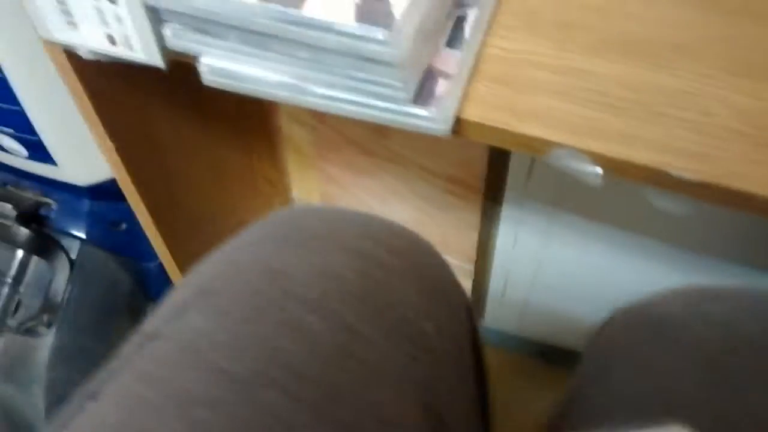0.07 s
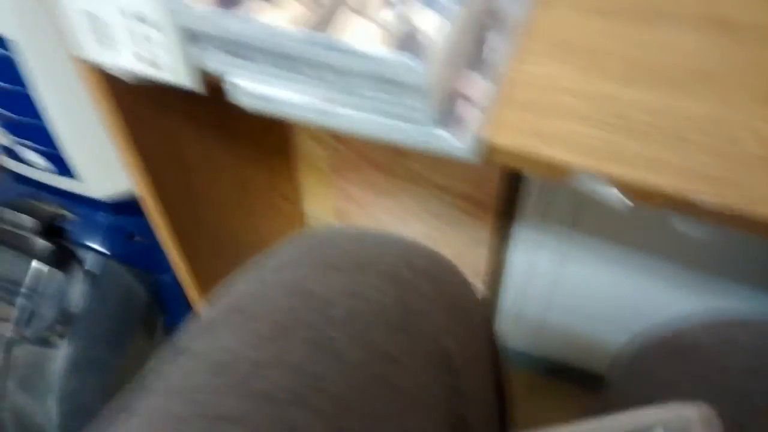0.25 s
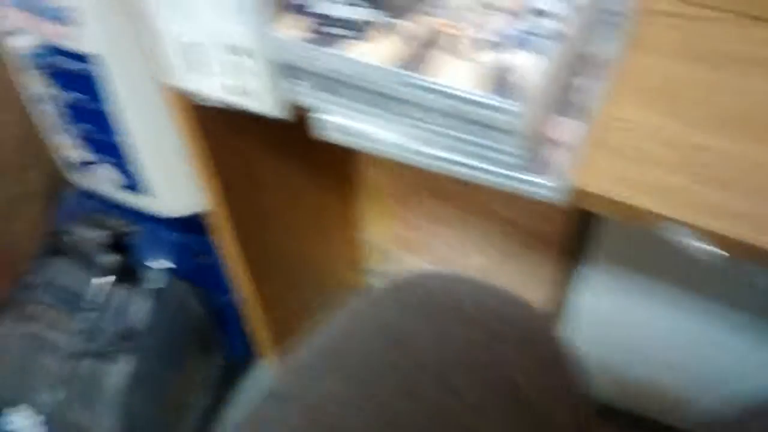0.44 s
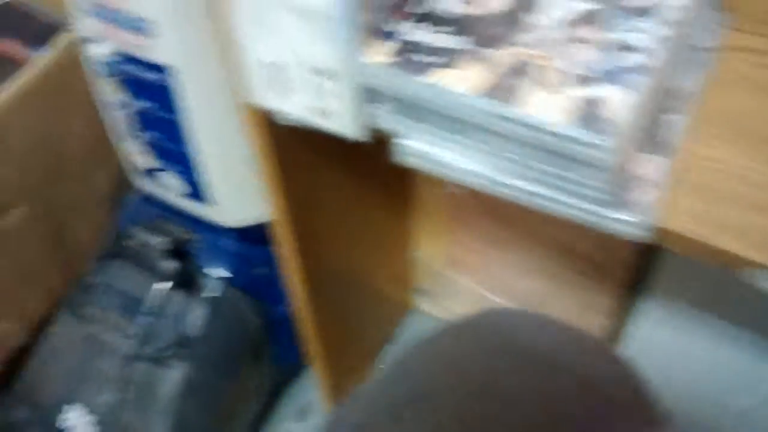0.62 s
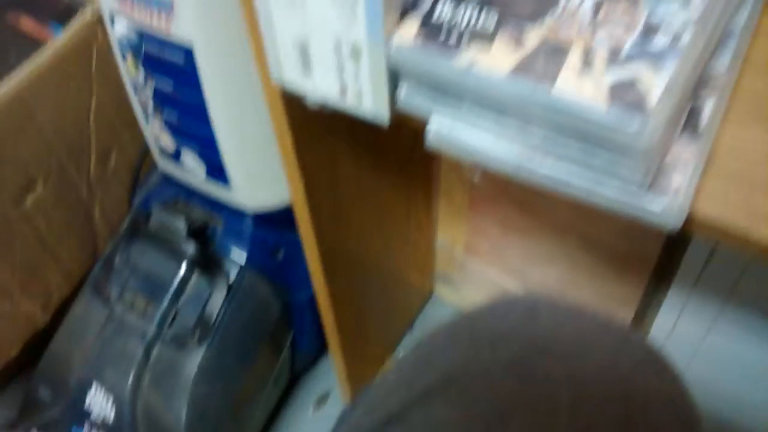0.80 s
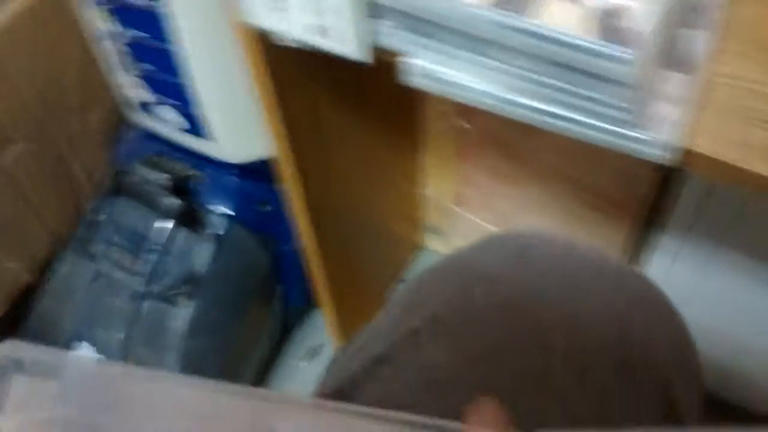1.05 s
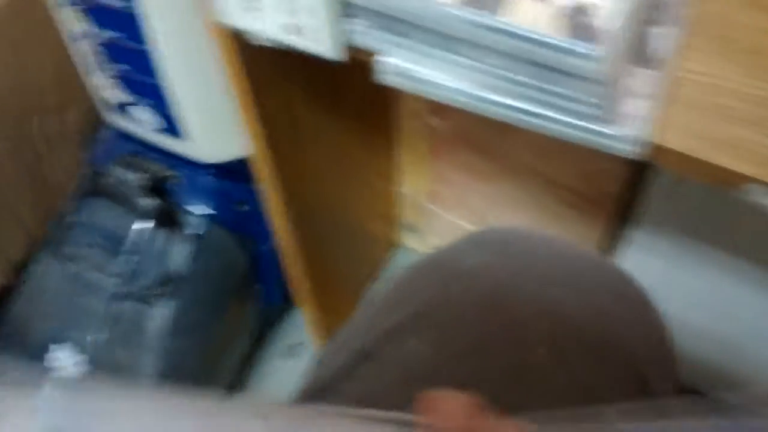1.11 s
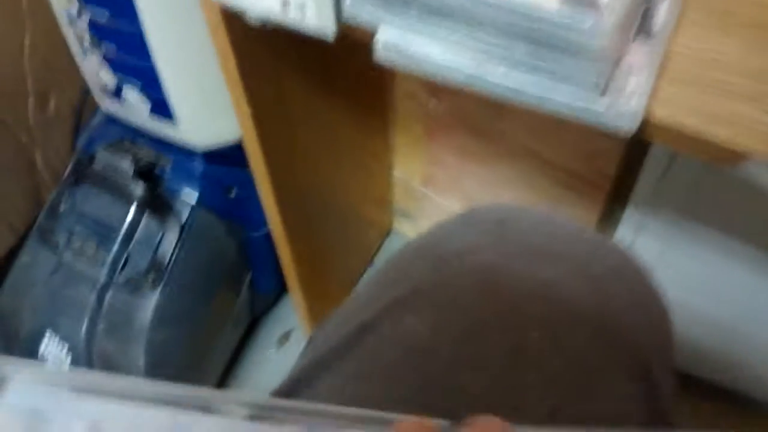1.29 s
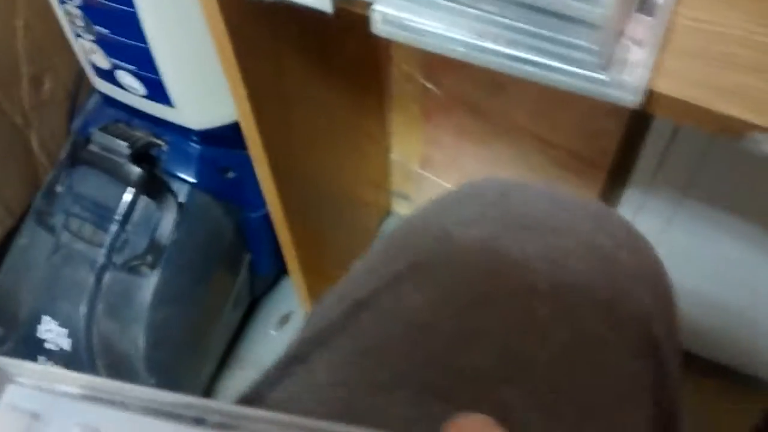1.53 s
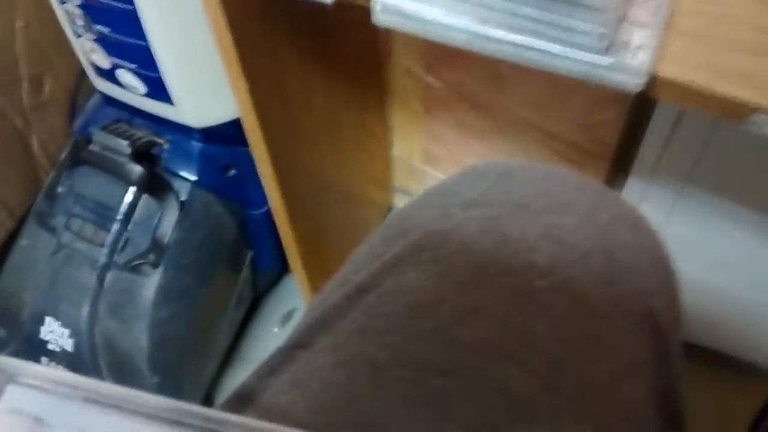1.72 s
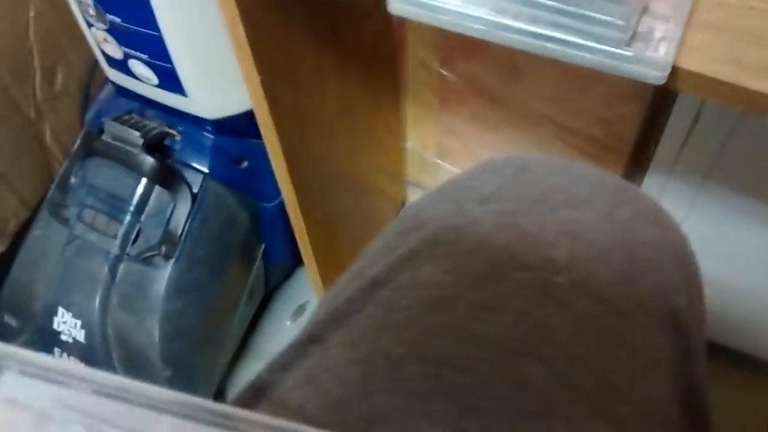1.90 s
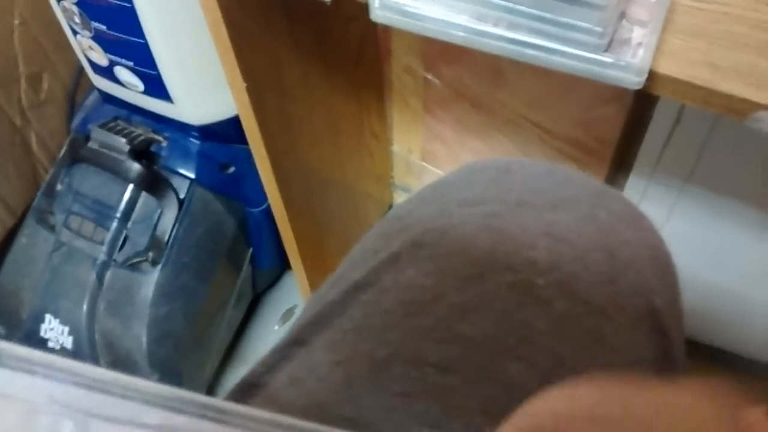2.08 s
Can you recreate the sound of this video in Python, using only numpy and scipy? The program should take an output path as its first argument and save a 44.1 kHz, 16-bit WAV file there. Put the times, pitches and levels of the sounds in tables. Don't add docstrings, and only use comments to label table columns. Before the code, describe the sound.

A thin hard plastic disc case is handled close to the microphone. Faint ticks lead to a loud, tight burst of snaps at 0.2-0.26 seconds. Quieter clicks at 0.5 become a rattling, creaking run from 0.6 to 0.8, ending in a sharper clack. Small snaps return around 1.26-1.34, then sparse ticks and soft finger slides near 1.9-2.0. Dull grip thuds, faint hiss and hum, small quiet room.

```python
import sys
import numpy as np
from scipy import signal
from scipy.io import wavfile
from scipy.ndimage import uniform_filter1d

SR = 44100
rng = np.random.default_rng(int(sys.argv[2]) if len(sys.argv) > 2 else 0)


def convert_level_to_amplitude(level_db):
    exponent = np.asarray(level_db, float) / 20
    return 10 ** exponent


def bounce(signal):
    frames = np.transpose(np.atleast_2d(signal))
    limited = np.clip(frames, -1, 1)
    pcm = np.round(limited * 32767).astype(np.int16)
    wavfile.write(sys.argv[1], SR, pcm)


N = 94815

SNAP_STARTS = [.2085, .2153, .221, .2295, .2405, .2443, .247, .255, .4865, .4915, .5115, .5965, .609, .624,
               .637, .683, .697, .7005, .7115, .716, .728, .7325, .741, .753, .7595, .8005, .803, .8052,
               .808, 1.2608, 1.274, 1.2967, 1.2985, 1.3358, 1.337]
# peak_db, brightness_db_per_octave, rattle_s, panel_pitch_hz, edge_pitch_hz
SNAP_BLOWS = [(0, 0, 0.0014, 534, 1900), (0.5, -0.5, 0.0018, 600, 1790), (-7, -1.5, .005, 347, 3400),
              (-5, 0, 0.0034, 2300, 3850), (-7, 0, 0.0023, 1380, 2000), (0, 3.5, 0.0029, 730, 4050),
              (-3.5, -3.5, 0.0071, 630, 1650), (-9.5, 2.5, 0.0046, 830, 3000), (-29.5, 0, .004, 3160, 3000),
              (-26.5, 0.5, 0.0035, 665, 1760), (-25, -2, 0.0053, 1650, 3900),
              (-18.5, -3, 0.0033, 1627, 2320), (-27.5, 0, .004, 900, 2830), (-29, 9, 0.0024, 3500, 5800),
              (-21.5, 3, 0.00057, 1200, 6000), (-20.5, 0, 0.0073, 600, 2370), (-15, 0, 0.0054, 900, 2620),
              (-21.5, 0, 0.002, 700, 1500), (-15, 1, 0.0035, 966, 2650), (-22, 0.5, 0.0021, 1670, 2700),
              (-17.5, 1, 0.0046, 725, 2800), (-22, 0, 0.0011, 1200, 3000), (-21, -1.5, 0.0049, 1700, 2750),
              (-30.5, 4, .002, 1750, 3700), (-23.5, 1, .003, 910, 1900), (-21, 5, 0.0025, 1590, 2650),
              (-18, 0.5, 0.0023, 700, 2200), (-10.5, 0.5, 0.0032, 433, 1555), (-18, 0, 0.004, 630, 2700),
              (-17.5, 1, 0.0043, 380, 2670), (-28, 0, 0.0041, 650, 2500), (-20.5, 7, 0.0018, 1200, 2757),
              (-19.5, -3, 0.0036, 614, 1450), (-20.5, 6, 0.0017, 2360, 3390),
              (-16.5, -0.5, 0.0032, 623, 1450)]
# start_s, peak_db, brightness_db_per_octave, spot_pitch_hz
SMALL_TICKS = [(.007, -35, -3.5, 610), (.025, -35, -10, 610), (0.122, -42, -1, 403), (.277, -19, 1, 645),
               (.330, -27.5, -3, 1640), (.361, -31.5, -1, 3270), (.390, -39, 4, 4060),
               (0.572, -36.5, -3.5, 3900), (0.8599, -30, -3.5, 1680), (.945, -33, 0.5, 2000),
               (.983, -32, -0.5, 1460), (1.033, -40.5, 2, 3460), (1.158, -35, -4.5, 3440),
               (1.198, -34, 2, 2620), (1.210, -40.5, -4.5, 1360), (1.413, -38, 3, 4430),
               (1.451, -27.5, -1, 1530), (1.534, -33.5, -1.5, 655), (1.583, -33.5, -1.5, 1430),
               (1.598, -38, 4, 1300), (1.828, -39, -0.5, 480), (1.852, -34.5, -5, 1300),
               (1.949, -32.5, -1, 600), (1.966, -31.5, -1, 1300), (1.997, -30.5, 6, 6800),
               (2.055, -37.5, -1, 1350)]
# pitch_hz, level_db, t60_s
SHELL_MODES = [(291, -9, 0.044), (424.3, -4.5, 0.041), (636.4, 1.5, 0.044), (870, -13, 0.013),
               (1300, -3, 0.04), (1626, -3.5, 0.028), (2000, -22, 0.0049), (2294, -6.5, 0.079),
               (2620, 4.5, 0.022), (3257, 0, 0.025), (3750, -11.5, 0.026), (4110, -5, 0.018),
               (5700, -13, 0.03), (6483, -2, 0.015)]
# frequency_hz, level_db_per_hz
CRACK_COLOUR = [(200, -6), (500, -4.5), (1000, 0.5), (2300, -2.5), (4200, -4.5), (5200, -16.5),
                (9000, -21.5), (15000, -42)]
# time_s, level_db
RUB_PRESSURE = [
    (0.0, -60.5),
    (0.56, -62.5),
    (0.68, -50),
    (1.71, -68),
    (2.15, -71),
]
# start_s, crest_s, end_s, dull_level_db, bright_level_db
SLEEVE_SLIDES = [
    (0.577, 0.592, 0.6, -46, -50),
    (0.641, 0.643, 0.74, -52, -44),
    (0.673, .72, 0.65, -47, -44),
    (0.797, 0.802, .806, -38, -47),
    (1.404, 1.406, 1.468, -56, -45),
    (1.84, 1.871, 1.897, -45.5, -51),
    (1.888, 1.955, 1.928, -41, -47.5),
    (1.94, 1.98, 2.02, -40, -41),
    (2.031, 2.053, 2.04, -59, -53.5),
]
# pitch_hz, width_hz, level_db
SLEEVE_MODES = [(600, 72, -9.5), (1300, 24, -8), (1474, 250, 0), (2200, 36, -6.5), (3100, 100, 2.5),
                (3870, 93, -2), (6800, 130, -12), (9410, 48, -24.5)]
# start_s, level_db, pitch_hz
HAND_JOLTS = [(0.223, -25, 113), (.247, -20, 37.5), (0.49, -39, 82.5), (0.584, -25.5, 87), (0.693, -24, 80),
              (0.744, -23, 102.5), (0.799, -27.5, 99), (0.816, -31, 40), (1.031, -46, 100),
              (1.261, -33.5, 110), (1.339, -32, 80), (1.95, -39, 49)]
# frequency_hz, level_db_per_hz
ROOM_COLOUR = [(12, -53), (20, 2), (68, -12.5), (86, -25), (120, -17.5), (200, -20), (500, -22.5),
               (3530, -27.5), (16000, -37)]
# frequency_hz, t60_s
WALL_DECAY = [(250, 0.17), (1000, 0.14), (4000, 0.17), (12000, 0.14)]
# frequency_hz, left_right_likeness (-1..1), left_minus_right_db
PORT_PAIR = [(40, -.4, 2), (300, .95, 3), (1100, .95, 4), (1550, .8, -5), (1950, -.95, -5), (2450, -.9, -5),
             (2800, -.3, -5), (3400, .75, -4), (4200, .55, -5), (5000, -.3, 1), (9000, -.1, 2)]

CRACK_DB, CRACK_T60_S = -11, 0.018
PANEL_DB, PANEL_T60_S = 8, 0.035
EDGE_DB, EDGE_T60_S = 9.5, 0.025
TICK_RATTLE_S, RIM_HZ = 0.0033, 2620
DETUNE, UNEVEN_DB = 0.015, 1.5
FREE_RATTLE_S, GRIP_HOLD = 0.005, 0.7
RATTLE_DB, RATTLE_DAMPING, SLIPS_PER_S = -10, 0.4, 2500
SHELL_LOW_HZ = 220
RUB_PER_S, RUB_SPREAD_DB = 1500, 3.5
SLIDE_EDGE_DB, SLEEVE_SPLIT_HZ = -13, 2800
JOLT_T60_S, JOLT_RIGHT = 0.12, -0.35
WALLS_DB = -14.5
ROOM_DB, DIFFUSE = -52.5, 0.61
HUM_HZ, HUM_DB = 58, -67.5
GRIP_HZ, GRIP_DB, GRIP_FOLLOW = 72, -55.5, 0.67
KNEE_DB, SQUEEZE, RECOVER_DB_PER_S = -30.5, 0.24, 33.5
TOP_HZ = 16200


def snap(start_s, peak_db, bright_db, rattle_s, panel_hz, edge_hz):
    struck = [(panel_hz, PANEL_DB, PANEL_T60_S), (edge_hz, EDGE_DB, EDGE_T60_S)]
    hz, db, t60 = np.transpose(SHELL_MODES + struck)
    chance = rng.standard_normal((2, len(hz)))
    db = db + UNEVEN_DB * chance[1] + bright_db * np.log2(hz / 1500)
    hz = hz * (1 + DETUNE * chance[0])
    t60 = t60 * (max(rattle_s, 1e-4) / FREE_RATTLE_S) ** GRIP_HOLD

    t = np.arange(3000) / SR
    colour = [(f, d + bright_db * np.log2(f / 1500)) for f, d in CRACK_COLOUR]
    crack = at_ports(colour, size=3000, count=256)
    crack = crack * convert_level_to_amplitude(CRACK_DB - 60 * t / CRACK_T60_S) * np.minimum(t / 0.00072, 1)

    u = t / max(rattle_s, 1e-4)
    slip_times = clicks(size=3000, per_s=SLIPS_PER_S, spread_db=4.0) * u * np.exp(1 - u)
    slip = peaked(ring(hz, db, RATTLE_DAMPING * t60)) + crack
    rattle = signal.fftconvolve(slip, slip_times[None], axes=1)[:, :3000]

    sound = peaked(ring(hz, db, t60)) + crack + convert_level_to_amplitude(RATTLE_DB) * peaked(rattle)
    sound = signal.sosfilt(signal.butter(2, SHELL_LOW_HZ, "high", fs=SR, output="sos"), sound)
    return start_s, convert_level_to_amplitude(peak_db) * peaked(sound)


def case():
    out = np.zeros((2, N))
    for start_s, blow in zip(SNAP_STARTS, SNAP_BLOWS):
        add(out, *snap(start_s, *blow))
    for start_s, peak_db, bright_db, spot_hz in SMALL_TICKS:
        add(out, *snap(start_s, peak_db, bright_db, TICK_RATTLE_S, spot_hz, RIM_HZ))
    return out


def fingers():
    hz, db, t60 = np.transpose(SHELL_MODES)
    rub = grains(hz, db - 7.2 * np.log2(hz / 1500), 0.51 * t60, RUB_PER_S, RUB_SPREAD_DB)
    out = convert_level_to_amplitude(curve(RUB_PRESSURE)) * rub

    hz, width, db = np.transpose(SLEEVE_MODES)
    low = hz < SLEEVE_SPLIT_HZ
    t60 = 1.74 / (width + 200)
    dull = grains(hz[low], db[low], t60[low], per_s=5000, spread_db=2.3)
    bright_mode_db = db[~low] + 8.9 * np.log2(hz[~low] / 3000)
    bright = grains(hz[~low], bright_mode_db, 0.65 * t60[~low], per_s=7000, spread_db=2.5)

    t = np.arange(N) / SR
    for start, crest, end, dull_db, bright_db in SLEEVE_SLIDES:
        swell = convert_level_to_amplitude(curve([(start, SLIDE_EDGE_DB), (crest, 0), (end, SLIDE_EDGE_DB)]))
        stroke = uniform_filter1d(swell * (t > start) * (t < end), size=200)
        out += stroke * (convert_level_to_amplitude(dull_db) * dull + convert_level_to_amplitude(bright_db) * bright)
    return out


def grains(hz, db, t60, per_s, spread_db):
    out = np.zeros((2, N))
    for _ in range(6):
        chance = rng.standard_normal((2, len(hz)))
        spot = ring(hz * (1 + 0.088 * chance[0]), db + 2.9 * chance[1], t60)
        out += signal.oaconvolve(clicks(N, per_s / 6, spread_db)[None], spot, axes=1)[:, :N]
    return evened(out)


def jolts():
    out = np.zeros((2, N))
    t = np.arange(8000) / SR
    for start_s, db, hz in HAND_JOLTS:
        thud = convert_level_to_amplitude(db - 60 * t / JOLT_T60_S) * np.sin(2 * np.pi * hz * t) * np.minimum(t / 0.00078, 1)
        add(out, start_s, thud * np.array([[1], [JOLT_RIGHT]]))
    return out


def walls(x):
    taps = np.zeros((2, SR // 2))
    slots = np.arange(200, SR // 2 - 20, 20)
    places = slots + rng.integers(0, 20, (2, len(slots)))
    np.put_along_axis(taps, places, rng.choice([-1., 1.], (2, len(slots))), 1)
    hz, t, z = signal.stft(taps, SR, nperseg=256)
    fade = convert_level_to_amplitude(-60 * t / read(WALL_DECAY, hz)[:, None])
    tail = signal.istft(z * fade, SR, nperseg=256)[1]
    return signal.fftconvolve(x, tail / np.linalg.norm(tail[0]), axes=1)[:, :N]


def room_tone():
    hiss = convert_level_to_amplitude(ROOM_DB) * at_ports(ROOM_COLOUR, size=N, likeness=DIFFUSE)
    hum = convert_level_to_amplitude(HUM_DB) * np.sqrt(2) * np.sin(2 * np.pi * HUM_HZ * np.arange(N) / SR)
    low = signal.sosfilt(signal.butter(2, GRIP_HZ, fs=SR, output="sos"), rng.standard_normal((2, N)))
    grip = evened(low) * convert_level_to_amplitude(GRIP_DB + GRIP_FOLLOW * (curve(RUB_PRESSURE) + 54.5))
    return hiss + hum + grip


def ring(hz, db, t60, size=3000):
    t = np.arange(size) / SR
    side = np.array([.5, -.5])[:, None, None]
    lag = -np.arccos(np.clip(read(PORT_PAIR, hz), -1, 1))
    tilt_db = side * read(PORT_PAIR, hz, column=2)[:, None]
    gain = convert_level_to_amplitude(db[:, None] + tilt_db - 60 * t / t60[:, None])
    phase = 2 * np.pi * hz[:, None] * t + (side - .5) * lag[:, None]
    onset = np.sin(np.pi / 2 * np.minimum(t / 0.00041, 1)) ** 2
    return (gain * np.sin(phase)).sum(1) * onset


def at_ports(colour, size, likeness=1.0, count=1024):
    hz = np.fft.rfftfreq(count, 1 / SR)
    a, b, c, d = rng.standard_normal((size * 4 // count + 5, len(hz), 4)).T
    same = np.clip(likeness * read(PORT_PAIR, hz), -1, 1)[:, None]
    left = a + 1j * b
    right = same * left + np.sqrt(1 - same ** 2) * (c + 1j * d)
    tilt_db = likeness * read(PORT_PAIR, hz, column=2) * np.array([[.5], [-.5]])
    z = np.array([left, right]) * convert_level_to_amplitude(read(colour, hz) + tilt_db)[:, :, None]
    return evened(signal.istft(z, nperseg=count, noverlap=count * 3 // 4)[1][:, :size])


def clicks(size, per_s, spread_db):
    draw = rng.random((size, 3))
    sign = np.sign(draw[:, 0] - .5)
    happens = draw[:, 1] < per_s / SR
    return sign * happens * convert_level_to_amplitude(-spread_db * np.log(draw[:, 2] + 0.0037))


def read(points, hz, column=1):
    cols = np.transpose(points)
    return np.interp(np.log(hz + 1), np.log(cols[0] + 1), cols[column])


def curve(points):
    return np.interp(np.arange(N) / SR, *np.transpose(points))


def evened(x):
    return x / np.sqrt(np.mean(x ** 2) + 1e-20)


def peaked(x):
    return x / (abs(x).max() + 1e-12)


def add(mix, start_s, sound):
    part = mix[:, round(start_s * SR):][:, :sound.shape[1]]
    part += sound[:, :part.shape[1]]


def scene():
    near = case() + fingers()
    return near + convert_level_to_amplitude(WALLS_DB) * walls(near) + room_tone() + jolts()


def top_cut(x):
    return signal.sosfilt(signal.butter(12, 16500, fs=SR, output="sos"), x)


def record(dry):
    power_db = 10 * np.log10(abs(uniform_filter1d((dry ** 2).mean(0), 800, origin=399)) + 1e-12)
    fall_db = np.arange(N) * RECOVER_DB_PER_S / SR
    held_db = np.maximum.accumulate(power_db + fall_db) - fall_db
    over_db = np.maximum(held_db - KNEE_DB, 0)
    ducked = dry / convert_level_to_amplitude(SQUEEZE * uniform_filter1d(over_db, 400, origin=199))
    ducked = signal.oaconvolve(ducked, signal.firwin(255, TOP_HZ, fs=SR)[None], "same", axes=1)
    return top_cut(np.clip(ducked, -1, 1))


dry = scene()
out = record(dry)
bounce(out)
```